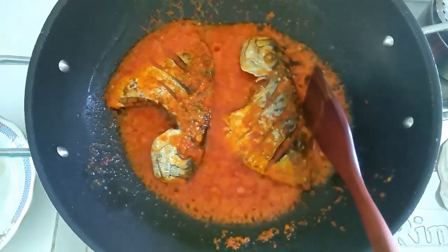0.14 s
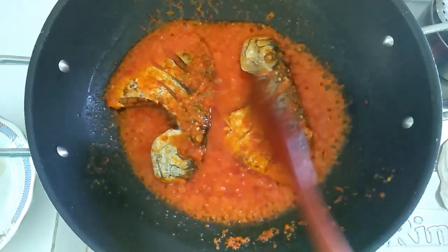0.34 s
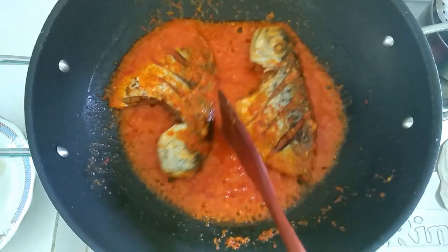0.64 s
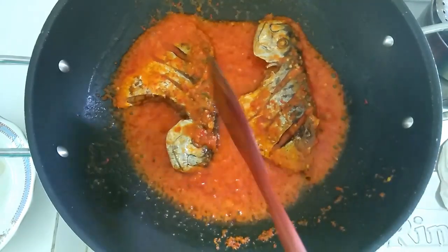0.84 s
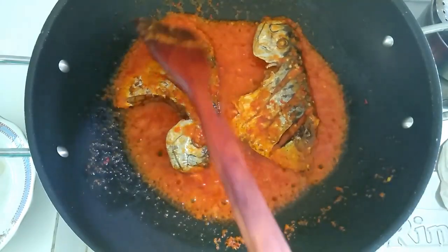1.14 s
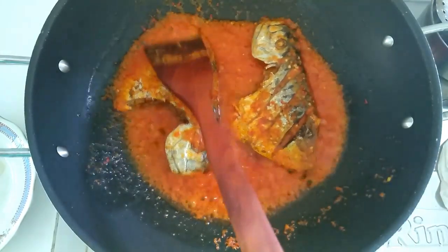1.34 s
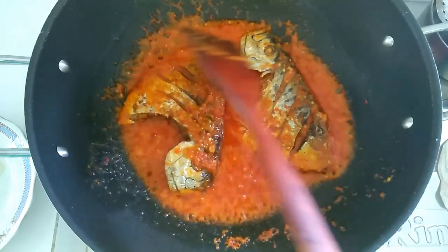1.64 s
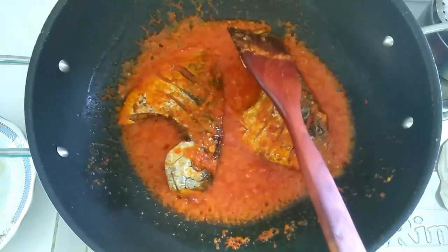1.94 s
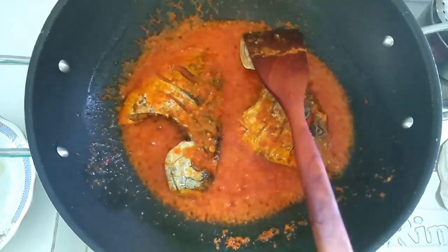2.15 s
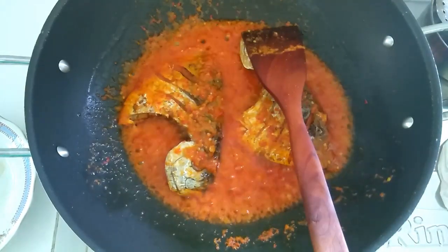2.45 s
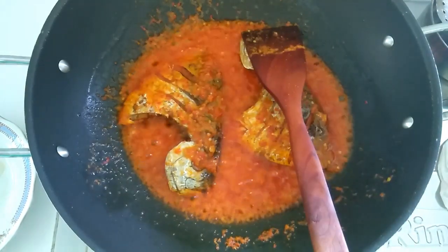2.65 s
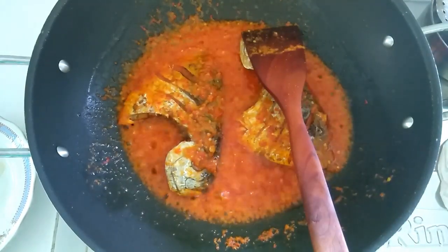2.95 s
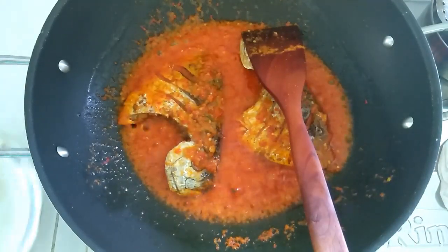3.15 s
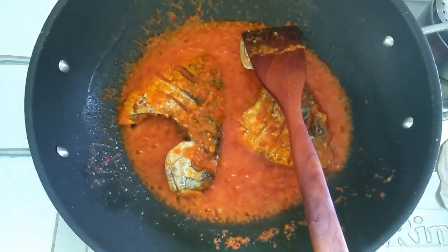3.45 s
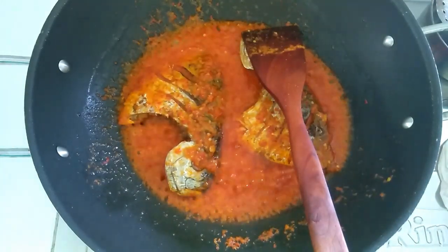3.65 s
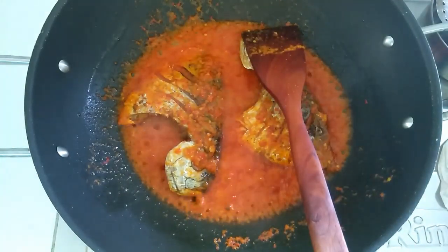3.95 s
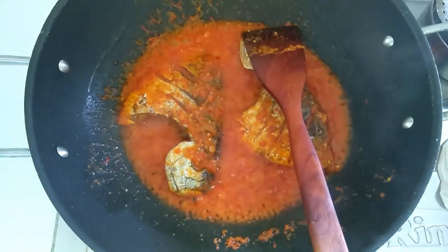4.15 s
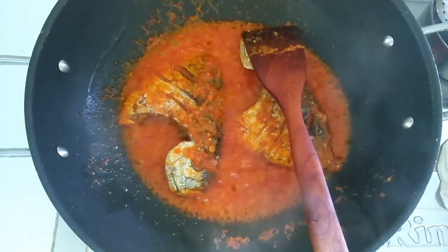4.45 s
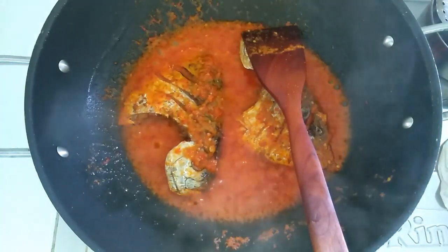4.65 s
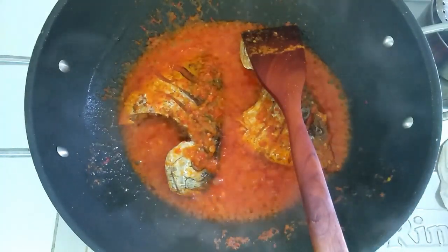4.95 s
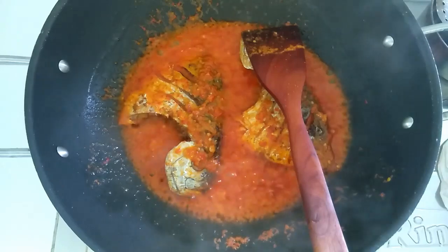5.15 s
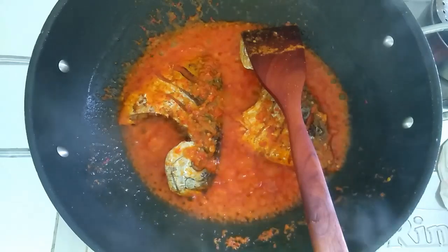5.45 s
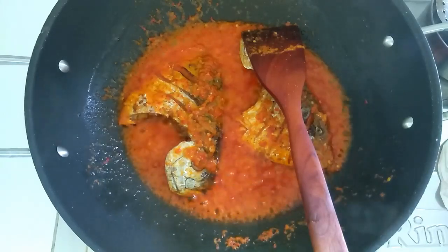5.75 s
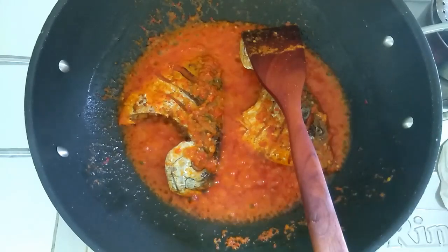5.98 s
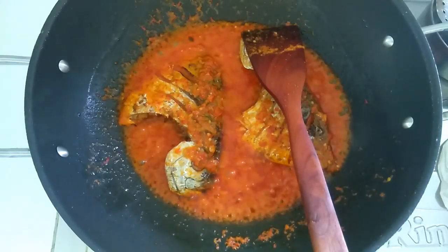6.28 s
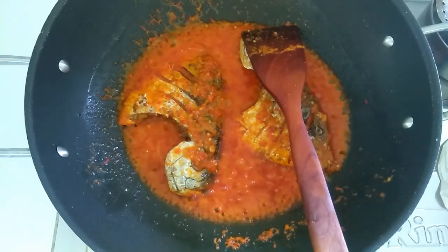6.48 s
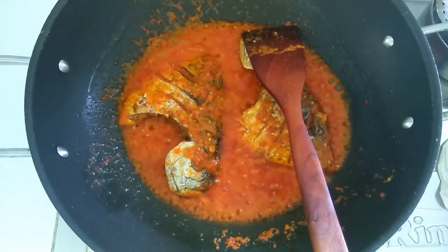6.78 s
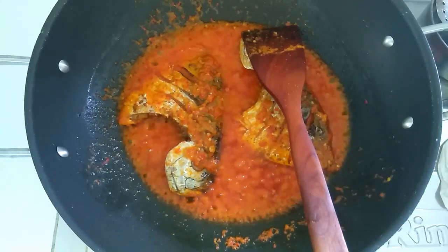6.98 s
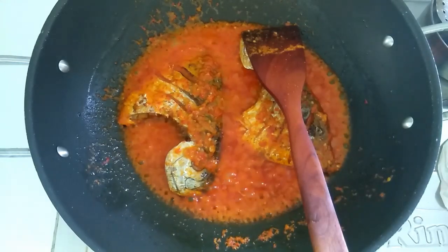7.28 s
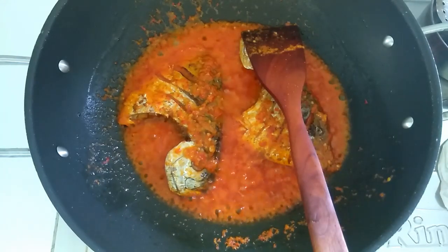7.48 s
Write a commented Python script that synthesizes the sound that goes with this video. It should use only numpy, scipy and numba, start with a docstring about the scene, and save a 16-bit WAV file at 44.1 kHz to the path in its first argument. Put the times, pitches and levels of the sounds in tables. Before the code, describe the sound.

A bright, high sizzle of thick sauce simmering around fish in a wok runs for the whole seven and a half seconds, heard close from above. It flutters and sputters in short spurts, over the quiet rush of a gas flame and a faint low gurgle. Drops burst with tiny sharp snaps, several in the first second and a half, then again around 3.7, 6.7 and 6.9 seconds. A wooden spatula gives soft, dull taps on the wok near 0.1 and 0.7 seconds, and spreads the sauce with a faint added hiss from about 0.4 to 2.2 seconds. At about 2.4 seconds its handle lands on the rim with a light wooden knock, and the sputtering stays slightly fuller from there. Between 5.8 and 6.4 seconds a few thick bubbles plop softly, barely nudging the spatula. The sizzle continues to the end.

```python
"""A bright sizzle, close from above: fish simmers in thick sauce in a wok over a gas flame.
Along the hot rim tiny bubbles ring as damped oscillators, fizzing and sputtering in spurts, and drops snap.
A wooden spatula spreads hissing sauce, taps the wok's low modes and is laid down with a knock.
Later a few thick bubbles plop. Beneath it all the sauce gurgles and the flame murmurs through the
resonant hollows around the bowl. A limiter ducks after the sharpest snaps."""
import sys
import numpy as np
from scipy import signal
from scipy.fft import rfft, irfft, next_fast_len
from scipy.io import wavfile
from scipy.ndimage import uniform_filter1d, minimum_filter1d
from numba import njit

SR = 44100
rng = np.random.default_rng(int(sys.argv[2]) if len(sys.argv) > 2 else 0)


def unload_wav(signal):
    """Save mono or channel-first audio to the path in sys.argv[1] as 16-bit WAV at rate SR, clipped to [-1, 1]."""
    wavfile.write(
        sys.argv[1],
        SR,
        np.round(np.clip(np.atleast_2d(signal).T, -1, 1) * 32767).astype(np.int16),
    )


N = 336042
TIME = np.arange(N) / SR

# vigour of the frying at the rim, as the base level of the fizz: (time [s], level [dB])
FRYING_VIGOUR = [(0, -16.5), (.76, -14.6), (.88, -15.5), (1.3, -16.5), (2.1, -15), (2.3, -16), (3.1, -14.8),
                 (4.15, -16.6), (4.8, -14.8), (6.45, -14), (6.72, -15.5), (7.3, -13.5), (7.62, -14.5)]
# sauce licks hot metal in dying runs: (start [s], spurts [count], spacing [s], first rise [dB])
SPURT_RUNS = [(.1, 1, .07, 2.5), (.315, 1, .07, 4), (.652, 2, 0.074, 2.3), (2.278, 2, .067, 3.2),
              (2.607, 4, 0.079, 3.3), (3.316, 3, 0.06, 3.5), (3.757, 3, 0.072, 4.5), (4.038, 1, .07, 4),
              (4.195, 5, .06, 1.5), (5.355, 2, 0.075, 4.3), (5.756, 3, .076, 2.5), (6.015, 5, 0.062, 1.5),
              (6.48, 1, .07, 1), (6.765, 4, 0.065, 2)]
# the loudest drops bursting: (time [s], relative level [dB])
DROP_BURSTS = [(.123, 6.3), (.209, 5), (.814, 6.5), (.862, 1), (.883, 5), (1.356, 4), (2.415, -2),
               (3.663, 5), (6.698, 5.5), (6.923, 3)]
# spatula touching the wok, first by hand, later nudged by thick bubbles: (time [s], relative level [dB])
SPATULA_TOUCHES = [(.129, -24), (.164, -27), (.742, -26), (1.56, -34), (2.277, -33), (2.394, -30),
                   (2.42, -33), (6.072, -34), (6.38, -32)]
# normal modes of the wok and of the wooden handle: (frequency [Hz], gain [dB], t60 [s])
BOWL_MODES = [(159, -23, 0.18), (239, -1.5, 0.13), (268, -9, 0.26), (322, -14, 0.11)]
HANDLE_MODES = [(300, -4, .1), (655, 2.5, 0.14), (840, 4, 0.13), (993, 3, 0.13), (1380, -3, .08),
                (1500, -2, 0.09), (1760, -3, .07)]
# thick bubbles opening: (time [s], note level [dB], pitch [Hz], puff level [dB], puff top [Hz])
THICK_BUBBLES = [(5.833, -26, 640, -22.5, 1650), (5.932, -34, 515, -30, 1150), (6.005, -26, 643, -24, 1450),
                 (6.07, -34, 486, -31, 1000), (6.379, -23.5, 608, -31, 800)]
# the sauce sloshes: (time [s], relative level [dB])
SAUCE_SLOSHES = [(.55, -49), (2.2, -47.5), (6.15, -50)]
# spectral envelopes of fizz, sputter and flame: (frequency [Hz], gain [dB])
FIZZ_SPECTRUM = [(2500, -34), (4500, -14.5), (6200, -3), (7400, -0.5), (8200, 0.5), (9500, 2.5), (10200, 3),
                 (11300, 0), (12200, -0.5), (13200, -6.5), (14400, -6.5), (15800, -9.5)]
SPUTTER_SPECTRUM = [(500, -35.5), (1200, -12.5), (2000, -10), (2500, -5.5), (2900, -3), (3250, -2.5),
                    (3550, -4), (4000, -1), (5000, -0.9), (6000, -2), (8000, -10), (14000, -56)]
FLAME_SPECTRUM = [(20, -40), (95, -35), (130, -24), (180, -17.5), (230, -9.5), (300, -10), (400, -7),
                  (600, -9.5), (900, -2.5), (1400, -3), (2100, -1.5), (2900, -3.5), (3600, -8), (6000, -33)]
# cavity resonances of bowl and stove: (frequency [Hz], bandwidth [Hz], gain [dB])
CAVITY_MODES = [(237, 20, -9), (265.5, 21, -7.5), (323, 20, -7), (496.6, 23, -2), (604, 21, 0),
                (659.5, 15.6, 2.5), (753, 47, 4), (1008, 157, 2.5), (1512, 190, -1.5)]

STIR_START_S, LAID_DOWN_S, KNOCK_S = 0.38, 2.24, 2.386   # the spatula stirs, rests, meets the rim


def sizzle():
    """Bubble resonance: small bubbles fizz, larger ones sputter, amid the dry ticks of tearing films."""
    vigour_db = np.interp(TIME, *np.transpose(FRYING_VIGOUR))
    # the resting spatula presses fish onto the metal: more sputter
    pressed = np.clip((TIME - LAID_DOWN_S) / .03, 0, 1)
    sputter_db = -25 + .35 * (vigour_db - vigour_db.mean()) + 2.2 * pressed
    rise_db = spurts(half_length_s=0.024, loss_db=0.14)
    flutter_db = 0.75 * drift(27)
    sputter_flutter_db = 0.7 * flutter_db + 0.41 * drift(25)
    fine = bubble_cloud(4007, 15503, per_s=7000, cycles=155, spread_db=2.5, patchy_db=1.5, bands=20)
    coarse = bubble_cloud(1192, 7080, per_s=4200, cycles=104, spread_db=1.5, patchy_db=1.0, bands=16)
    ticks = unit_rms(random_clicks(per_s=16000, spread_db=3.5))
    fizz = unit_rms(colour(fine + from_db(2.5) * ticks, FIZZ_SPECTRUM))
    sputter = unit_rms(colour(coarse + from_db(2.1) * ticks, SPUTTER_SPECTRUM))
    return (fizz * from_db(vigour_db + 0.51 * rise_db + flutter_db)
            + sputter * from_db(sputter_db + rise_db + sputter_flutter_db))


def spurts(half_length_s, loss_db):
    """Amplitude modulation, in dB: each spurt of a run swells and fades, weaker than the last."""
    rise_db = np.zeros(N)
    for start, count, gap_s, first_db in SPURT_RUNS:
        for k in range(round(count)):
            s = start + k * gap_s
            near = slice(*np.searchsorted(TIME, [s - half_length_s, s + half_length_s]))
            swell = (1 - ((TIME[near] - s) / half_length_s) ** 2) ** 2
            rise_db[near] += (first_db - k * loss_db) * swell
    return rise_db


def bubble_cloud(low_hz, high_hz, per_s, cycles, spread_db, patchy_db, bands):
    """Free oscillation: each bubble rings at its own pitch and falls 60 dB in the given cycles."""
    chance, pitch_draw, level_draw = rng.random((3, N))
    starts = np.flatnonzero(chance < per_s / SR)
    hz = low_hz + (high_hz - low_hz) * pitch_draw[starts]
    # like sizes come in clumps, so each band wanders in level
    clumps = np.array([drift(25)[starts] for _ in range(bands)])
    band = (pitch_draw[starts] * bands).astype(int)
    db = patchy_db * clumps[band, np.arange(len(starts))]
    db += spread_db * np.minimum(-np.log(1 - level_draw[starts]), 5)
    heights = from_db(db) * np.sqrt(hz) * rng.choice([-1, 1], N)[starts]
    return unit_rms(damped_sines(starts, heights, hz, cycles * SR / hz))


def snaps():
    """Impulse response: a bursting drop is a bright crack of a few cycles; lesser ones come at random."""
    drops = clicks_at(DROP_BURSTS) + from_db(-14) * random_clicks(per_s=3.3, spread_db=5.0)
    return from_db(2) * ring(drops, hz=9200, t60=0.00087)


def spread_hiss(hz, width_hz, fade_s):
    """Narrow-band shot noise: sauce spread thinly over hot metal hisses while the spatula moves."""
    moving = np.clip(np.minimum(TIME - STIR_START_S, LAID_DOWN_S - TIME) / fade_s, 0, 1)
    ticks = random_clicks(per_s=9000, spread_db=3)
    hiss = resonate(resonate(ticks, hz, width_hz), hz, width_hz)
    return from_db(-30.5) * moving * unit_rms(hiss)


def spatula():
    """Soft impact: wood cushioned by sauce excites only the lowest modes of the wok."""
    force = butterworth(clicks_at(SPATULA_TOUCHES) + 1e-18, 420, "low")
    return sum(from_db(db) * ring(force, hz, t60) for hz, db, t60 in BOWL_MODES)


def handle_knock(decay_s, rattle_hz):
    """Modal vibration: the handle lands on the rim and rings over a dull, quickly dying rattle."""
    blow = clicks_at([(KNOCK_S, -24)])
    wood = sum(from_db(db) * ring(blow, hz, t60) * (-1) ** k
               for k, (hz, db, t60) in enumerate(HANDLE_MODES))
    rattle = unit_rms(butterworth(rng.standard_normal(N), rattle_hz, "band"))
    envelope = (TIME > KNOCK_S) * np.exp(-np.abs(TIME - KNOCK_S) / decay_s)
    return wood + from_db(-22.5) * rattle * envelope


def plops(rise_s, puff_low_hz, overtone_ratio, overtone_db):
    """Cavity resonance: the crater of a thick bubble briefly hums two notes while steam puffs out."""
    out, steam = np.zeros(N), rng.standard_normal(N)
    for s, db, hz, puff_db, top_hz in THICK_BUBBLES:
        age = np.clip(TIME - s, 0, .5)
        phase = 2 * np.pi * hz * age
        notes = np.sin(phase) + from_db(overtone_db) * np.sin(overtone_ratio * phase)
        puff = unit_rms(butterworth(steam, [puff_low_hz, top_hz], "band"))
        envelope = age / rise_s * np.exp(1 - age / rise_s)
        out += (from_db(db) * notes + from_db(puff_db) * puff) * envelope
    return out


def gurgle(slosh_s):
    """Resonant pitch falls with size: large bubbles gurgle low in the sauce, swelling with each slosh."""
    sloshes = sum(from_db(db) * np.exp(-((TIME - s) / slosh_s) ** 2) for s, db in SAUCE_SLOSHES)
    bubbles = bubble_cloud(145, 302, per_s=170, cycles=24, spread_db=-2.0, patchy_db=1.0, bands=4)
    return from_db(-2.5) * (from_db(-57.5) + sloshes) * bubbles


def flame():
    """Forced resonance: the steady rush of burner and steam is coloured by the hollows around the bowl."""
    drive, rush = rng.standard_normal((2, N))
    hollows = sum(from_db(db) * resonate(drive, hz, width_hz) * (-1) ** k
                  for k, (hz, width_hz, db) in enumerate(CAVITY_MODES))
    return from_db(-29.0) * unit_rms(hollows + colour(rush, FLAME_SPECTRUM))


@njit
def damped_sines(starts, heights, hz, t60_samples):
    """Superposition: one exponentially decaying sine for each bubble."""
    out = np.zeros(N)
    for k in range(len(starts)):
        phasor = heights[k] + 0j
        step = np.exp(-np.log(1000) / t60_samples[k] + 2j * np.pi * hz[k] / SR)
        for i in range(starts[k], min(starts[k] + int(t60_samples[k]), N)):
            phasor *= step
            out[i] += phasor.imag
    return out


def ring(clicks, hz, t60):
    """Damped mode: a unit impulse starts it at a height of about 1."""
    width_hz = np.log(1000) / (np.pi * t60)
    return resonate(clicks, hz, width_hz) * SR / (2 * np.pi * width_hz)


def resonate(x, hz, width_hz):
    """Two-pole resonance with unit peak gain."""
    r = np.exp(-np.pi * width_hz / SR)
    feedback = [1, -2 * r * np.cos(2 * np.pi * hz / SR), r * r]
    return signal.lfilter(np.array([1, 0, -1]) * (1 - r * r) / 2, feedback, x + 1e-18)


def colour(x, spectrum):
    """Spectral shaping by a gain curve over log frequency."""
    hz, db = np.transpose(spectrum)
    size = next_fast_len(N)
    bins_hz = np.maximum(np.fft.rfftfreq(size, 1 / SR), 1)
    gain = from_db(np.interp(np.log(bins_hz), np.log(hz), db))
    return irfft(rfft(x, size) * gain, size)[:N]


def butterworth(x, hz, kind, order=2):
    """Filtering with a maximally flat passband."""
    return signal.sosfilt(signal.butter(order, hz, kind, fs=SR, output="sos"), x)


def clicks_at(rows):
    """Impulse train: one click for each (time [s], level [dB]) row."""
    s, db = np.transpose(rows)
    return np.bincount(np.round(s * SR).astype(int), from_db(db), N)


def random_clicks(per_s, spread_db):
    """Shot noise: independent impulses, many small and a few large."""
    at = np.flatnonzero(rng.random(N) < per_s / SR)
    heights = from_db(spread_db * np.minimum(rng.exponential(1, N), 5)) * rng.choice([-1, 1], N)
    return np.bincount(at, heights[at], N)


def drift(corner_hz):
    """Low-passed noise: a slow wander of unit rms."""
    hop, settle = 40, 2000
    r = np.exp(-2 * np.pi * corner_hz * hop / SR)
    noise = rng.standard_normal(N // hop + settle + 2)
    slow = signal.lfilter([1], [1, -2 * r, r * r], noise)[settle:]
    return np.interp(np.arange(N) / hop, np.arange(len(slow)), unit_rms(slow))


def from_db(db):
    """Decibels to amplitude ratio."""
    return 10 ** (np.asarray(db) / 20)


def unit_rms(x):
    """Normalisation to unit power."""
    return x / np.sqrt(np.mean(x ** 2) + 1e-20)


def scene():
    """Superposition: all sources add at one microphone, the same in both channels."""
    lows = spatula() + handle_knock(decay_s=0.02, rattle_hz=[220, 1700]) + gurgle(slosh_s=.45)
    lows += plops(rise_s=0.009, puff_low_hz=360, overtone_ratio=2.02, overtone_db=-6)
    lows = butterworth(lows, 140, "high", order=4)   # the small bowl radiates little bass
    wok = sizzle() + spread_hiss(hz=5800, width_hz=900, fade_s=.3) + snaps() + flame() + lows
    return np.array([wok, wok])


def limiter(x, ceiling_db, release_db_per_s):
    """Peak limiting: the gain drops within a millisecond ahead of a peak over the ceiling, creeps back."""
    over_db = np.maximum(20 * np.log10(np.abs(x).max(axis=0) + 1e-9) - ceiling_db, 0)
    release_db = release_db_per_s * TIME
    held_db = np.maximum.accumulate(over_db + release_db) - release_db
    gain_db = uniform_filter1d(minimum_filter1d(-held_db, size=31), size=31)
    return x * from_db(gain_db)


def record(dry):
    """Peak and band limiting: the sharpest snaps are held down, then the highest treble is cut."""
    limited = limiter(dry, ceiling_db=0.54, release_db_per_s=74)
    low_pass = signal.firwin(401, cutoff=15800, fs=SR, window=("kaiser", 7))
    return signal.fftconvolve(limited, low_pass[None], mode="same", axes=1)


dry = scene()
out = record(dry)
unload_wav(out)
```